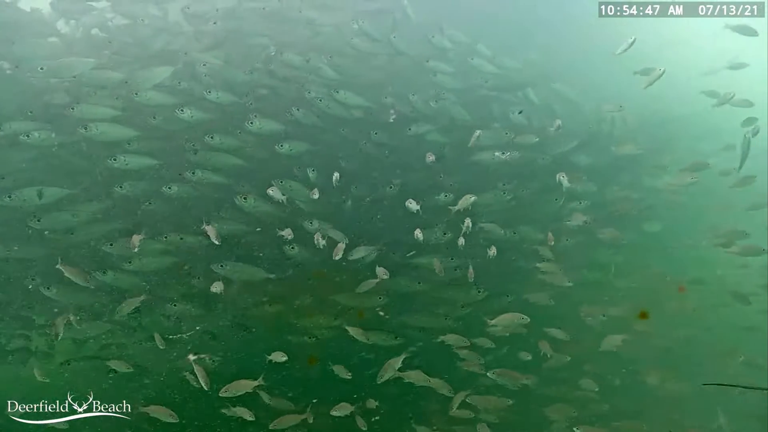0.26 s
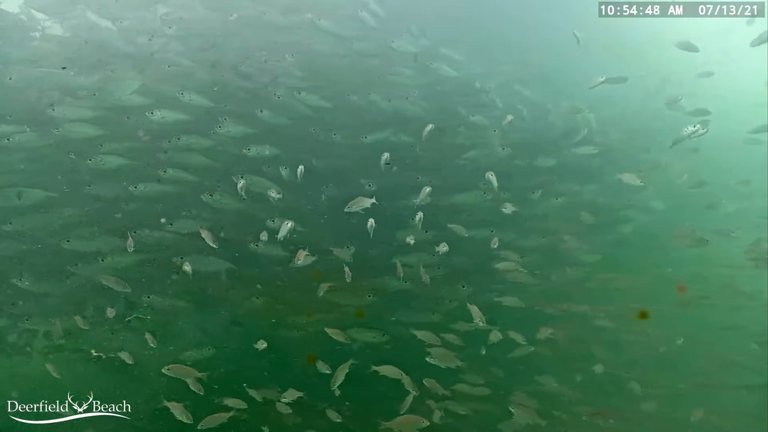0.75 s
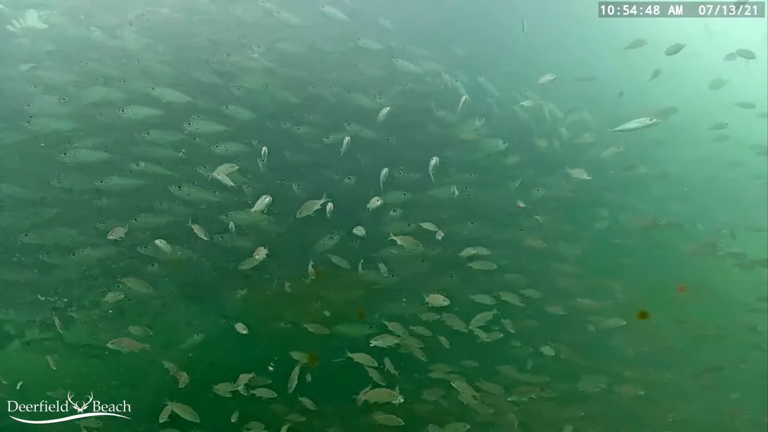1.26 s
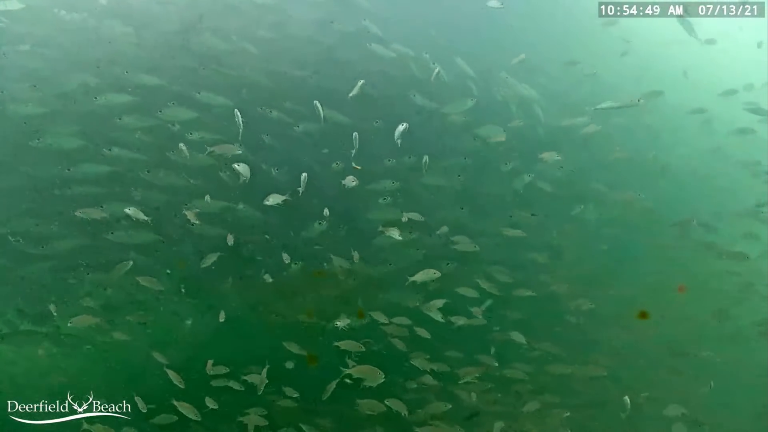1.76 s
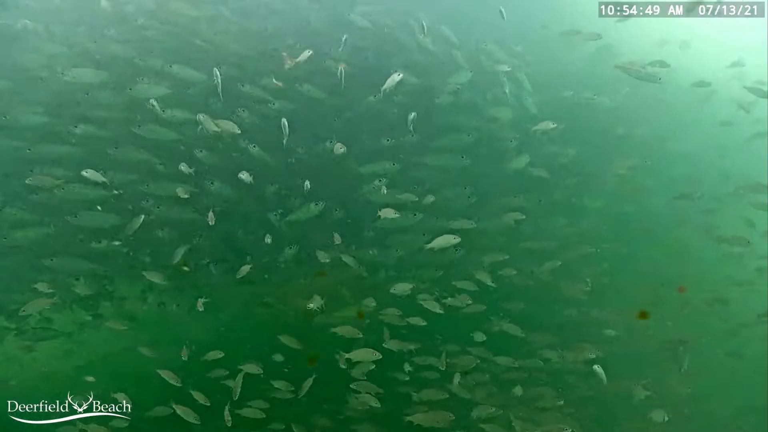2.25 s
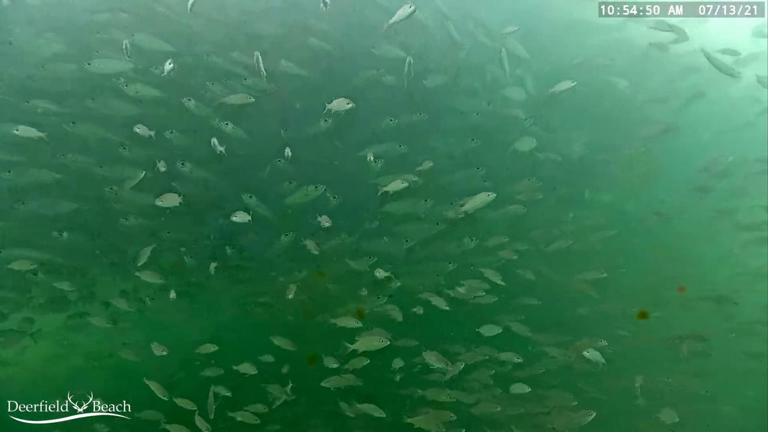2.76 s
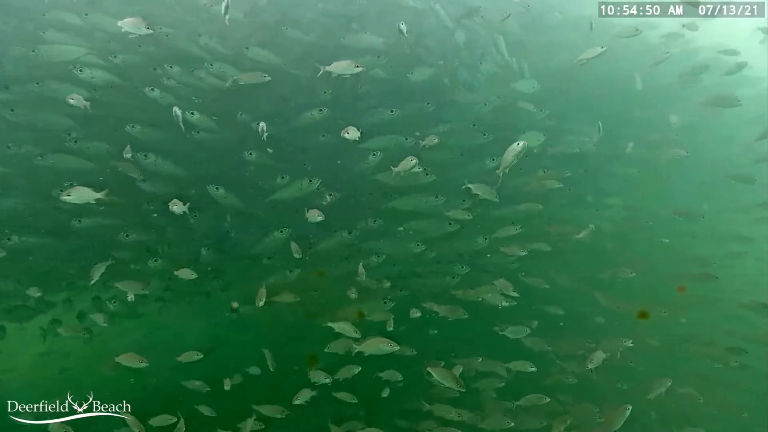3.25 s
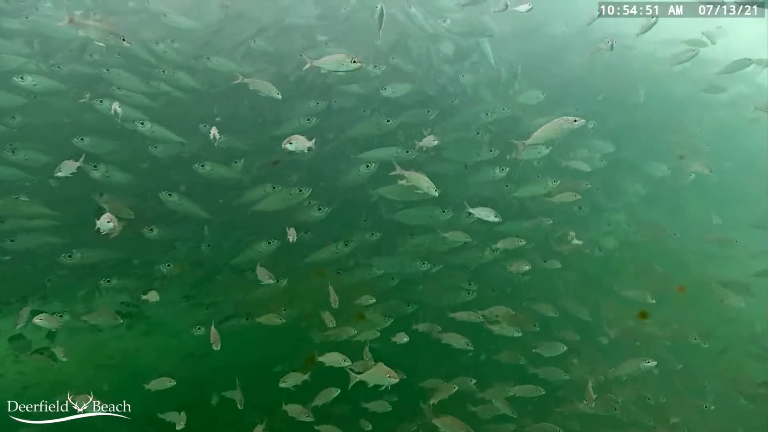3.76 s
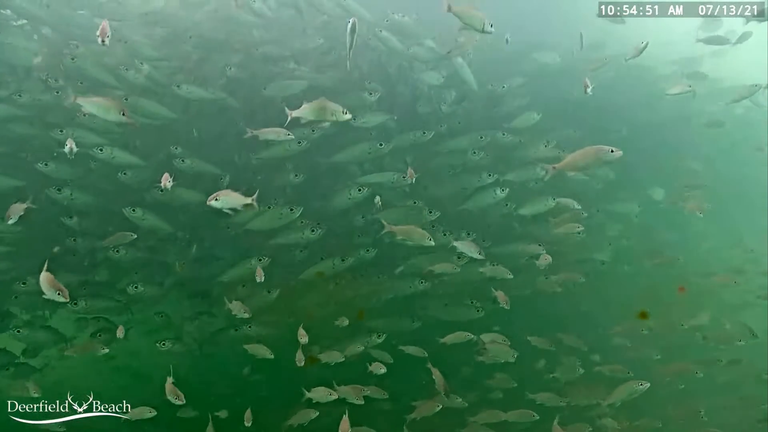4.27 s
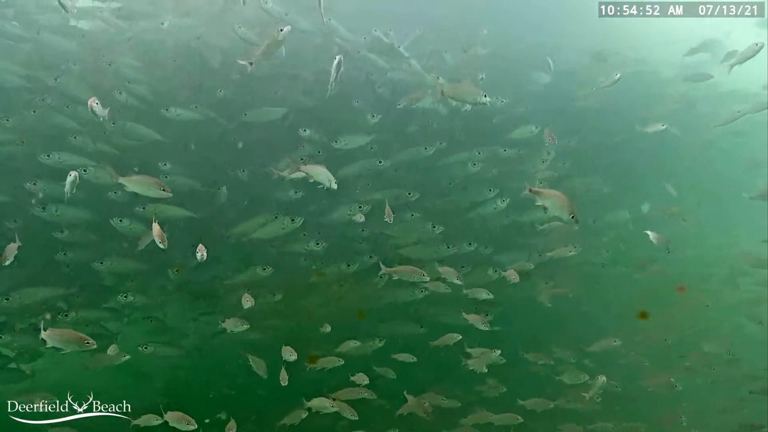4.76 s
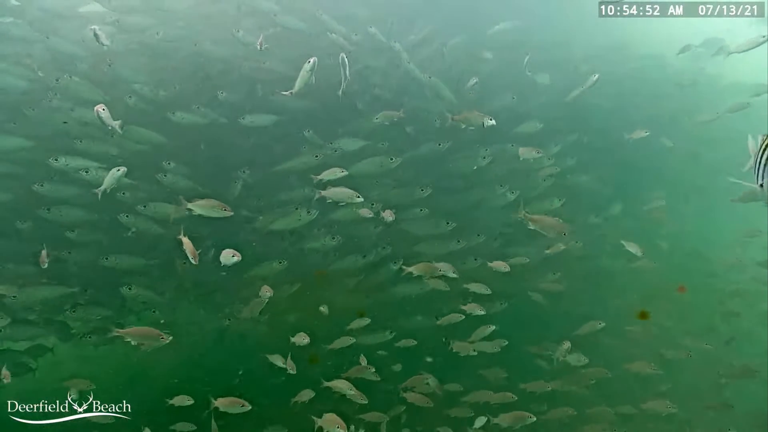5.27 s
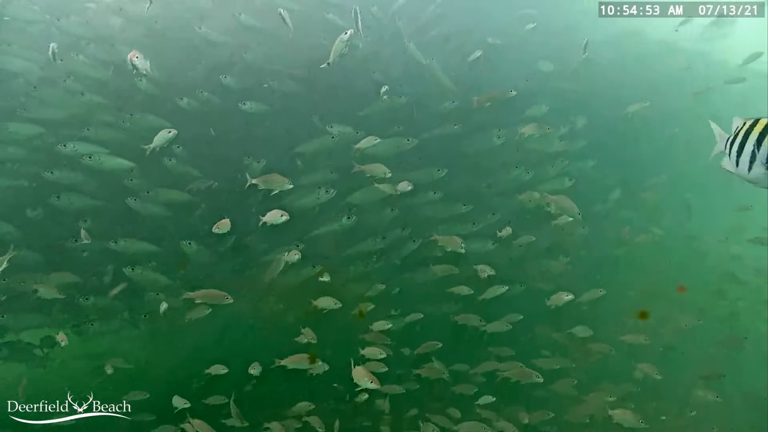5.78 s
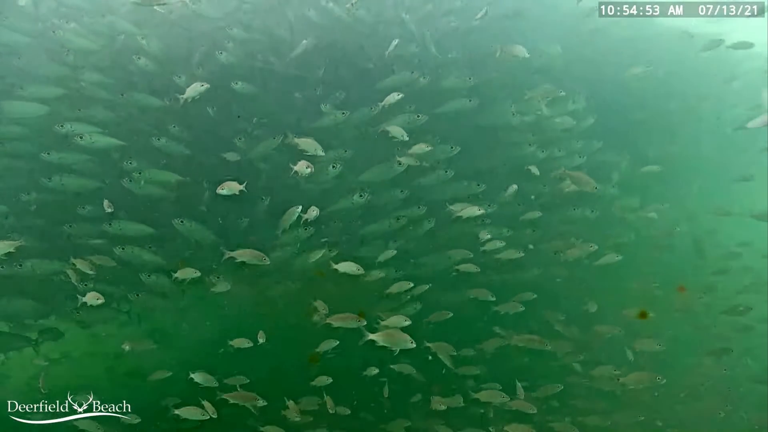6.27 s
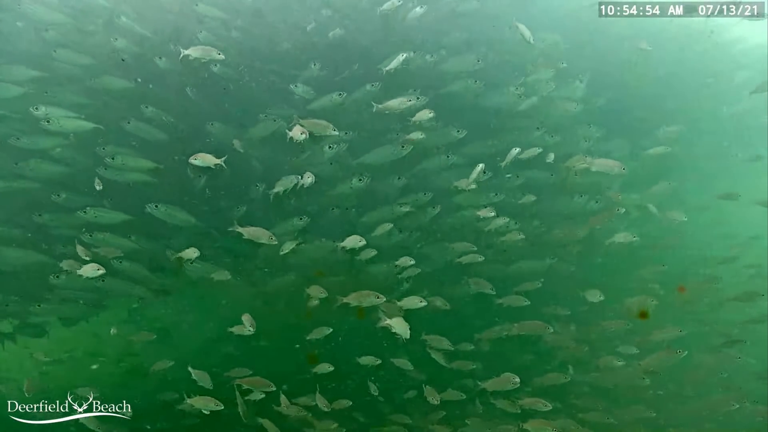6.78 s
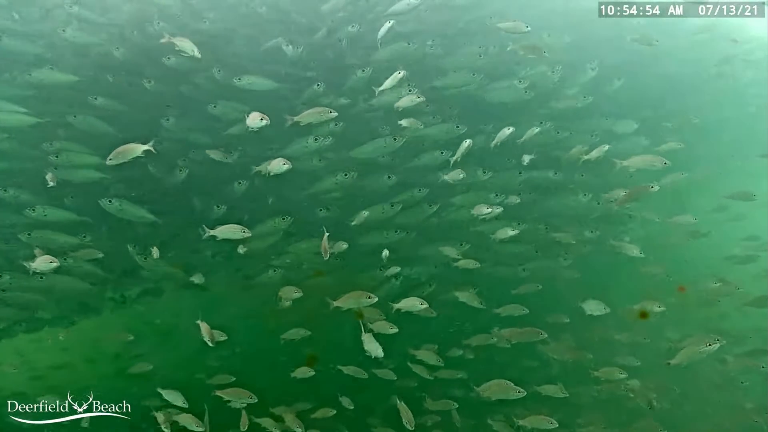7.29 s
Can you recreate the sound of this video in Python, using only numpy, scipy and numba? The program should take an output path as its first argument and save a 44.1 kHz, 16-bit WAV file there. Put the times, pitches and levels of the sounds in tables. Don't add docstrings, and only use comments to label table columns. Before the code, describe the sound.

A small quiet room with short reverberation, microphone close over a hard wooden tabletop, faint low hum and soft hiss throughout. At about 0.4 s a fingernail flicks a large coin: a click and brief bright ring. At 0.9 s a knuckle thuds softly on the wood with tiny bounces; faint skin rustles follow until 1.8 s. After near silence, a light touch at 2.5 s, then a crisp, clattering coin tap at 2.6 s. At 3.45 s the coin lands with the loudest sharp knocks, ringing high and booming the table, with another hard knock at 3.6 s. It spins: fast gritty pulses with bright hiss until 4 s, then woody grinding and rattling, roughly twenty wobbles a second, slowing slightly. Harder knocks stand out near 4.4, 5.4 and 6.6 s. The wobbles grow slower, uneven and weaker, with faint finger rustles around 7 s, fading into small scrapes by 7.5 s.

```python
import sys
import numpy as np
from scipy import signal
from scipy.fft import rfft, irfft
from scipy.io import wavfile
from scipy.ndimage import uniform_filter1d
from numba import njit

SR = 44100
rng = np.random.default_rng(int(sys.argv[2]) if len(sys.argv) > 2 else 0)


def waveform_to_disk(signal):
    frames = np.transpose(np.atleast_2d(signal))
    scaled = np.clip(frames, -1, 1) * 32767
    samples = np.round(scaled).astype(np.int16)
    wavfile.write(sys.argv[1], SR, samples)


def attenuation_scalar(level_db):
    decades = np.asarray(level_db, float) / 20
    return 10 ** decades


N = 332073
TIME = np.arange(N) / SR
STEP = 40
EDGES_HZ = 40 * 2 ** np.arange(0, 9, .5)
SPIN_START_S = 3.546


def rms_one(x):
    return x / np.sqrt(np.mean(x ** 2) + 1e-30)


def at_hz(points, hz):
    points_hz, values = np.transpose(points)
    return np.interp(np.log(hz), np.log(points_hz), values)


def at_time(points, s):
    return np.interp(s, *np.transpose(points))


def band(x, low_hz, high_hz, order=2):
    edges = [low_hz, min(high_hz, .45 * SR)]
    return signal.sosfilt(signal.butter(order, edges, "band", fs=SR, output="sos"), x)


def resonance(x, hz, width_hz):
    r = np.exp(-np.pi * width_hz / SR)
    poles = [1, -2 * r * np.cos(2 * np.pi * hz / SR), r * r]
    return signal.lfilter(np.array([1, 0, -1]) * (1 - r * r) / 2, poles, x)


@njit
def moving_resonance(x, gains, angles, r, step, first):
    out, y1, y2 = np.zeros(len(x)), 0., 0.
    for k in range(first, len(x) // step + 1):
        a, g = 2 * r * np.cos(angles[k]), (1 - r * r) / 2 * gains[k]
        for i in range(k * step, min(k * step + step, len(x))):
            y1, y2 = g * (x[i] - x[i - 2]) + a * y1 - r * r * y2, y1
            out[i] = y1
    return out


def ring(clicks, hz, t60):
    r, w = attenuation_scalar(-60 / (t60 * SR)), 2 * np.pi * hz / SR
    return signal.lfilter([0, np.sin(w)], [1, -2 * r * np.cos(w), r * r], clicks + 1e-18)


def convolve(x, response):
    return signal.fftconvolve(x, response)[:N]


def slow(rate):
    r = np.exp(-2 * np.pi * rate * STEP / SR)
    white = rng.standard_normal(N // STEP + 2002)
    return rms_one(signal.lfilter([1], [1, -2 * r, r * r], white)[2000:])


def drift(rate):
    steps = slow(rate)
    return np.interp(np.arange(N) / STEP, np.arange(len(steps)), steps)


def around(s):
    return slice(max(int((s - .2) * SR), 0), int((s + .3) * SR))


def add(out, s, rise, fall, gains):
    near = around(s)
    t = TIME[near] - s
    shape = np.exp(np.where(t < 0, -(t / max(rise, 2e-4)) ** 2, -t / max(fall, 5e-4)))
    out[:, near] += np.reshape(gains, (-1, 1)) * shape


def wood_response(spectrum, splits_hz):
    hz = np.maximum(np.fft.rfftfreq(8192, 1 / SR), 10)
    parts = []
    for low, high in zip(splits_hz, splits_hz[1:]):
        skirts = np.sqrt((1 + (low / hz) ** 14) * (1 + (hz / high) ** 14))
        size = attenuation_scalar(at_hz(spectrum, hz)) / skirts
        folded = irfft(np.log(size + 1e-7 * size.max()))
        folded[1:4096] *= 2
        folded[4097:] = 0
        parts.append(irfft(np.exp(rfft(folded))))
    return [p / np.sqrt(np.sum(p ** 2)) for p in parts]


def on_wood(force, spectrum, modes, splits_hz, wander_db, bend, glancing_db=0):
    parts = wood_response(spectrum, splits_hz)
    broad = sum(convolve(f, part) for f, part in zip(force, parts)) + 1e-18
    step_s = np.arange(N // STEP + 2) * STEP / SR
    late_db = glancing_db * (step_s > 4.2)
    first = int(2.6 * SR / STEP)
    out = broad.copy()
    for (hz, width_hz, db), bent in zip(modes, np.broadcast_to(bend, len(modes))):
        gains = attenuation_scalar(db + late_db + wander_db * np.tanh(slow(rate=20)))
        angles = 2 * np.pi * hz / SR * (1 + bent * slow(rate=8.3))
        out += moving_resonance(broad, gains, angles, np.exp(-np.pi * width_hz / SR), STEP, first)
    return out


def rustles(rows, swelling):
    white, out = rng.standard_normal(N), np.zeros(N)
    for s, db, hz, octaves, length in rows:
        force = np.zeros((1, N))
        add(force, s, length if swelling else .001, length, attenuation_scalar(db))
        near = around(s)
        half = 2 ** (octaves / 2)
        out[near] += force[0, near] * rms_one(band(white[near], hz / half, hz * half, order=3))
    return out


# [f/Hz, level/dB per Hz]
FLOOR = [(15, -66), (25, -36), (47, -13.5), (137, -9), (195, -6.5), (223, -12), (256, -10), (384, -14.5),
         (416, -16), (463, -16.5), (714, -21.5), (1940, -24), (2160, -22), (2610, -27.5), (16000, -52)]
# [t/s, level/dB]
FLOOR_LEVEL = [(0, -73), (.35, -74.5), (0.6, -65), (.92, -70.5), (1.21, -66.5), (1.8, -69), (2.12, -75),
               (2.55, -72.5), (2.85, -65.5), (3.3, -76), (3.44, -72.5), (3.63, -65), (6.0, -66.5),
               (7.1, -65.5), (7.53, -67.5)]
# [f/Hz, width/Hz, level/dB rms]
HUM = [
    (171, 16, -73),
    (468, 32, -75),
    (1057, 210, -83.5),
    (2135, 22, -79),
]


def floor():
    level_db = at_time(FLOOR_LEVEL, TIME)
    white, (rumble, rustle) = rng.standard_normal((3, N)), np.zeros((2, N))
    for k, (a, b) in enumerate(zip(EDGES_HZ, EDGES_HZ[1:])):
        part = rustle if a > 1200 else rumble
        part += attenuation_scalar(at_hz(FLOOR, np.sqrt(a * b))) * band(white[k % 2], a, b)
    out = attenuation_scalar(level_db + 6.5) * rms_one(rumble) + attenuation_scalar(level_db - 6.5) * rms_one(rustle)
    for (hz, w, db), follows in zip(HUM, [0, 0, 0, 0.4]):
        line = rms_one(resonance(resonance(white[2], hz, w), hz, w))
        out += attenuation_scalar(db + follows * (level_db + 66.5)) * line
    return out


# [f/Hz, t60/s]
ROOM_T60 = [(150, 0.2), (530, 0.25), (1400, 0.25), (3000, 0.24), (4600, 0.26), (6500, .28), (9700, 0.065),
            (16000, 0.048)]


def room(x):
    t = np.arange(SR // 2) / SR
    white = rng.standard_normal((2, len(t)))
    tail = np.zeros(len(t))
    for k, (a, b) in enumerate(zip(EDGES_HZ, EDGES_HZ[1:])):
        tail += band(white[k % 2], a, b) * attenuation_scalar(-60 * t / at_hz(ROOM_T60, np.sqrt(a * b)))
    power = np.abs(rfft(tail)) ** 2 + 1e-12
    evened = np.sqrt(uniform_filter1d(power, size=300) / uniform_filter1d(power, size=40))
    tail = irfft(rfft(tail) * evened, len(t))
    tail *= np.clip((t - .003) / .004, 0, 1)
    tail *= np.clip((.4 - t) / .1, 0, 1)
    return convolve(x, tail / np.sqrt(np.sum(tail ** 2)))


# [t/s, level/dB, centre f/Hz, width/octaves, half length/s]
BRUSHES = [(.84, -75, 5000, 1, 0.027), (1.02, -82, 5000, 1.8, 0.055), (1.17, -68.5, 9000, 1.2, .02),
           (1.25, -72.5, 3900, 1.4, 0.13), (1.352, -79, 13000, .35, .012), (1.45, -88, 4500, 1.7, .1),
           (1.548, -67, 12000, .9, .01), (1.7, -81.5, 4970, 1.3, 0.16), (1.74, -75, 7600, .12, 0.014),
           (1.84, -87, 7600, .12, 0.018), (6.912, -68, 11800, 0.37, 0.017),
           (6.915, -62.5, 7850, 0.37, 0.02), (7.32, -75, 8600, 0.36, .03)]


def brushes():
    return rustles(BRUSHES, swelling=True)


# [t/s, level/dB, centre f/Hz, width/octaves, length/s]
TOUCHES = [(.706, -73, 5600, .4, .003), (.8895, -47, 3000, 1.3, .002), (.891, -56, 7900, 1.5, .002),
           (.9, -65, 7800, .6, .003), (.909, -69, 7500, .2, .003), (.9245, -63, 3700, .5, .007),
           (.926, -58, 8800, .35, .004), (.927, -63, 13000, .26, .006), (.931, -62, 5700, .17, .006),
           (1.117, -75, 11000, .6, .002), (1.155, -69, 11000, .9, .005), (1.165, -77, 5850, .15, .012),
           (1.506, -66, 7600, .15, .011), (1.507, -66, 11500, 1, .003), (1.509, -71, 4450, .1, .003),
           (1.652, -73, 7500, .1, .005), (1.689, -58, 14500, .33, .011), (2.497, -58, 1500, .25, .004),
           (2.498, -61, 3200, .3, .002), (2.4985, -64, 4600, .25, .002), (2.499, -78, 9600, .1, .002),
           (2.539, -73, 7200, .4, .002), (3.391, -52, 2080, .52, .006), (3.392, -70, 3700, .15, .004),
           (5.106, -66, 11000, .8, .001), (6.977, -61, 13500, .3, .004), (6.978, -59, 7000, .8, .004),
           (7.343, -67, 4000, .3, .005), (7.417, -61, 6500, .5, .005), (7.429, -61, 7500, .9, .004),
           (7.489, -68, 6500, .6, .008)]


def touches():
    return rustles(TOUCHES, swelling=False)


# [f/Hz, level/dB per Hz]
FLICK = [(180, -54), (300, -42), (650, -19.5), (870, -27), (1320, -12.5), (1900, -11.5), (3190, -19),
         (4300, -21), (5900, -29), (7440, -17), (16000, -32)]


def flick():
    s, force = .3665, np.zeros((1, N))
    add(force, s, .0025, .0015, attenuation_scalar(-28.5))
    add(force, s + 0.011, .004, .008, attenuation_scalar(-56.5))
    scratch = force[0] * rng.standard_normal(N)
    scratch[int(s * SR)] += attenuation_scalar(-8.5)
    return convolve(scratch, wood_response(FLICK, [100, 18000])[0])


# [t/s, peak level/dB]
THUD = [
    (0.888, -29),
    (0.897, -50),
    (0.912, -66),
    (0.929, -67),
]
# [f/Hz, level/dB, t60/s]
THUD_MODES = [(246, -42, 0.074), (505, -12.5, 0.084), (777, 0.5, 0.02), (1160, 7.5, 0.0075),
              (1500, 6, 0.0013), (3650, -31, 0.011), (7600, -6, 0.012)]


def thud():
    s, db = np.transpose(THUD)
    clicks = np.zeros(N)
    clicks[(s * SR).astype(int) + 90] = -attenuation_scalar(db + 4)
    push = band(clicks, 204, 2500)
    return 10 * push + sum(attenuation_scalar(level) * ring(push, hz, t60) for hz, level, t60 in THUD_MODES)


# [f/Hz, level/dB, t60/s]
BOOM = [(162, -53, .09), (230, -43, .06), (295, -30, 0.08), (486, -29, 0.12)]
# [t/s, level/dB]
LANDINGS = [
    (3.457, 4.5),
    (3.479, 2),
    (3.547, -2),
    (3.596, -1.5),
    (3.648, -6.5),
    (3.705, -12.5),
    (3.759, -11.5),
]


def boom():
    clicks = np.zeros(N)
    for s, db in LANDINGS:
        clicks[int(s * SR)] = attenuation_scalar(db)
    return band(sum(attenuation_scalar(db) * ring(clicks, hz, t60) for hz, db, t60 in BOOM), 100, 900)


# [f/Hz, level/dB, t60/s]
COIN = [
    [(4387, 0, 1.6), (4440, -2, 1.5), (4470, -2, 1.5)],
    [(7599, 0, .6), (7625, -7, .5), (7560, -8, .4), (7660, -12, .4)],
    [(10116, -3, .6), (10158, -3, .6), (10205, 0, .55), (10260, -5, .5)],
]
# [t/s, low, middle and high group level/dB, time until damped/s]
STRIKES = [
    (0.366, -55, -41.5, -47.5, 0.26),
    (3.437, -102, -63, -69, 0.022),
    (3.454, -41, -58, -47, 0.2),
    (3.592, -42.5, -48, -45, 0.18),
    (4.393, -78.5, -57, -64, 0.073),
    (5.426, -67, -47, -64.5, 0.13),
]
DAMPED_T60_S = [.4, .14, .06]


def coin():
    out = np.zeros(N)
    flutter = attenuation_scalar([3.2 * drift(35) for group in COIN])
    for s, *group_db, length in STRIKES:
        start = int(s * SR)
        t = TIME[:min(SR, N - start)]
        span = slice(start, start + len(t))
        touched = np.maximum(t - length, 0)
        for modes, level_db, turn, damped in zip(COIN, group_db, flutter, DAMPED_T60_S):
            held = (1 - np.exp(-t / 0.0023)) * attenuation_scalar(-60 * touched / damped)
            tone = sum(attenuation_scalar(db - 60 * t / t60) * np.sin(2 * np.pi * hz * t) for hz, db, t60 in modes)
            out[span] += attenuation_scalar(level_db) * held * tone * turn[span]
    return out


# [t/s, peak level/dB, low, high and top share/dB]
KNOCKS = [(2.6169, -10.5, -4.5, -6, -22.5), (2.6185, -13.5, -3, -3, -14), (2.623, -20, -6.5, -8.5, -10),
          (2.63, -29, -6.5, -7, -14.5), (2.64, -29, -11, -5.5, -12.5), (2.647, -28, -7.5, -3.5, -6.5),
          (2.663, -24.5, -8, -7, -21.5), (3.456, -4.5, -6, -6.5, -27), (3.458, -4, -8, -6, -27),
          (3.4745, -6.5, -4, 0, -20), (3.4769, -6.5, -8, -7.5, -24), (3.4813, -8.5, -9.5, -15, -14.5),
          (3.503, -21.5, -1.5, -6.5, -22.5), (3.539, -18.5, -3.5, -6, -16.5), (3.5436, -18.5, -6, 0, -13),
          (3.548, -16, -3, -0.5, -17.5), (3.563, -24.5, -2.5, -4.5, -18), (3.5948, -9.5, -7.5, 2.5, -4),
          (3.5966, -11.5, -8, 1.5, -6.5), (3.608, -16.5, -8, -0.5, -16), (3.646, -18, 0, 3.5, -12),
          (3.9088, -20, -12, -5.5, -20.5), (4.395, -12.5, -5.5, -12, -23), (4.408, -11.5, -12, -16, -21),
          (4.4455, -13, -20, -11, -21), (5.4311, -15.5, -12, -3, -18), (5.4342, -13, -9, -13.5, -13),
          (6.6345, -16, -14, -10, -23), (6.979, -25, -9.5, -16, -20.5), (7.494, -46.5, 1.5, -18, -30)]
# [f/Hz, level/dB per Hz]
KNOCK_BROAD = [(24, -61), (40, -41.5), (467, -14.5), (1240, -5.5), (1340, -3), (1480, -8.5), (2260, 0),
               (3380, -5.5), (3830, -1), (4240, -6.5), (4570, -9), (13400, -46), (16000, -67)]
# [f/Hz, width/Hz, level over the broad answer/dB]
TAP_WOOD = [(1330, 50, 7), (1595, 47, 6), (1755, 30, 10), (1880, 20, 12), (2200, 30, 7), (2476, 24, 7.3),
            (2530, 24, 8), (2680, 21.1, 12), (3070, 28, 9), (3208, 24, 8), (3900, 40, 8.3), (4500, 24, 15),
            (5200, 40, 7), (5870, 33, 10), (6740, 47, 8.23), (7420, 26, 13), (8240, 30, 13), (9150, 36, 13)]
# [f/Hz, width/Hz, level over the broad answer/dB]
KNOCK_WOOD = [(690, 43, 2), (950, 40, 2), (1366, 45, 5), (1776, 11, 6), (2024, 16, 9.5), (2312, 20, 8),
              (2400, 27, 2.5), (2685, 25, 4), (2960, 13, 4), (3080, 16, 6), (3750, 30, 4), (3920, 45, 4),
              (4413, 14, 4.5), (4610, 14, 11), (5400, 60, 9), (5880, 42, -1), (6720, 60, 6), (7570, 40, 11),
              (7770, 31, 10.5), (8600, 95, 15.5)]


def knocks(from_s, to_s, modes):
    force, clicks = np.zeros((2, 4, N))
    for s, db, low_db, high_db, top_db in KNOCKS:
        if from_s < s < to_s:
            gains = attenuation_scalar([db + low_db, db, db + high_db, db + top_db])
            add(force, s, .0003, .0022, gains)
            clicks[:, int(s * SR)] = gains
    force = 0.84 * force * rng.standard_normal(N) - 1.5 * clicks
    return 0.51 * on_wood(force, KNOCK_BROAD, modes, [150, 1400, 3450, 7000, 18000],
                          wander_db=2.5, bend=.006, glancing_db=-7)


# [t/s, level/dB]
SKID = [(3.45, -102), (3.47, -64), (3.59, -62), (3.632, -55.5), (3.838, -72.5), (3.99, -75), (4.003, -99)]


def skid():
    flare = np.ones((1, N))
    for moment in np.linspace(*RUNS[1]):
        add(flare, moment, 0.0076, 0.0076, attenuation_scalar(0.5))
    grit = rng.standard_normal(N) * attenuation_scalar(2.5 * rng.standard_normal(N // 20 + 1).repeat(20)[:N])
    hiss = rms_one(band(grit, 7000, 16500) + 0.3 * band(grit, 12500, 16500))
    s, level_db = np.transpose(SKID)
    return flare[0] * attenuation_scalar(np.interp(TIME, s, level_db, -150, -150)) * hiss


# [t/s, level/dB]
GIVE = [(3.5, 12.5), (3.7, 4), (3.9, 4), (4.1, 4.5), (4.3, 3.5), (4.55, 2.5), (4.8, 0), (5.0, 1),
        (5.2, -0.5), (5.45, 6.5), (5.7, -0.5), (5.9, -3), (6.15, 4), (6.4, 0), (6.6, 0), (6.85, 1.5),
        (7.1, -8.5), (7.5, -6.5)]


def shares(s, db, bright_db):
    over_db = db + 28
    low_db = -1 - 0.58 * over_db + 0.16 * bright_db + at_time(GIVE, s)
    shine_db = 18.5 * np.exp((SPIN_START_S - s) / 0.27)
    high_db = -21 + 0.51 * over_db + bright_db + shine_db
    return attenuation_scalar([db + low_db, db, db + min(high_db, 6)])


# [first t/s, last t/s, wobbles]
RUNS = [
    (3.546, 3.648, 3),
    (3.705, 4.021, 7),
    (4.125, 4.567, 9),
    (4.77, 4.945, 4),
    (5.0, 5.43, 8),
    (5.485, 5.672, 4),
    (5.77, 6.033, 5),
    (6.1, 6.426, 6),
    (6.495, 6.765, 5),
    (6.842, 7.335, 8),
]
# [t/s, level/dB]
PRESSURE = [(3.546, -17.5), (3.65, -17), (3.83, -24), (4.02, -31), (4.125, -47.5), (4.24, -20.5),
            (4.41, -22.5), (4.57, -41.5), (4.8, -24), (5.18, -43.5), (5.37, -23.5), (5.77, -66.5),
            (5.9, -37.5), (6.36, -46.5), (6.6, -19.5), (6.84, -46.5), (7.13, -28.5), (7.33, -57.5)]
# [t/s, level/dB, brightness/dB, rise/s]
CATCHES = [(3.479, -12.5, -4.5, 0.002), (3.568, -31.5, -7.5, 0.0028), (6.576, -26, 3, 0.006),
           (6.505, -24, -5, 0.0064), (3.8, -22.5, 7, 0.0055), (3.968, -47, -6, 0.0077),
           (4.058, -32, 4.5, 0.011), (4.1714, -44, -7.5, 0.0034), (4.283, -23.5, 9, 0.0072),
           (4.6432, -27, -7.5, 0.0013), (4.757, -21, 5.5, 0.0008), (4.516, -24, 5, 0.005),
           (4.8934, -27, 15, 0.021), (4.947, -20, 8.5, 0.011), (5.0647, -17, -2.5, 0.012),
           (5.255, -29.5, 10.5, 0.012), (5.543, -27.5, -23, 0.0062), (5.4018, -29, 1, 0.0056),
           (5.6687, -25, -4, 0.0021), (5.8352, -26, -4, 0.0019), (5.9557, -28.5, 9.5, 0.0044),
           (7.134, -18.5, 0.5, 0.014), (6.1018, -25.5, 6.5, 0.019), (6.159, -35, 1, 0.0036),
           (6.224, -29, -2, 0.0084), (6.424, -26.5, 0, 0.009), (6.689, -21, 9.5, 0.003),
           (6.481, -27.5, 13, 0.0033), (6.654, -20.5, 8.5, 0.02), (6.7674, -22.5, 5, 0.0083),
           (6.9103, -22.5, -2.5, 0.0063), (6.983, -28.5, 2, 0.0066), (7.4244, -27.5, -1, 0.014),
           (7.493, -30.5, -6, 0.011)]
# [t/s, level/dB, low share/dB, brightness/dB]
BITES = [(3.53, -21, -1, 20), (3.644, -33, -20, 0), (3.716, -21, 3.5, 8), (3.759, -22.5, 1, 4),
         (3.852, -20, 4.5, 9.5), (3.958, -32.5, 5, 7), (3.9648, -23, -14, -5), (4.117, -41, -0.5, 7),
         (4.168, -28, -2, -3), (4.2293, -24, -12, 0), (4.333, -37, 0, -5), (4.352, -31.5, 3, -11),
         (4.564, -50, 0, -1), (4.773, -38, -5, 0), (4.817, -28, 2, 13), (4.881, -41.5, -17, -4),
         (4.9303, -30, -1, -6), (5.011, -24.5, 2.5, 4), (5.1156, -30, 0.5, 9), (5.176, -28, 5.5, 2),
         (5.236, -24.5, 2, -7), (5.2966, -24, 0, -3), (5.318, -31, 2.5, -3), (5.347, -32.5, 2, 0),
         (5.3712, -43.5, -4, 3), (5.557, -31, -13, 6), (5.6056, -33.5, -0.5, 4), (5.7684, -45, 5.5, 7),
         (5.890, -34.5, 8, -1), (5.949, -27, 4, 5), (5.976, -31.5, 1.5, 6), (6.038, -54, 5, 6),
         (6.0665, -47, -3, 5), (6.082, -32.5, 5, -2), (6.149, -33.5, -0.5, -1.5), (6.286, -38, 1, -2),
         (6.2975, -27.5, -2.5, -4), (6.348, -32.5, 6.5, 0), (6.491, -21, 4.5, 3), (6.562, -37.5, 10.5, -3),
         (6.62, -31, 0, -1), (6.784, -33, -7, 2), (6.8412, -49, 6.5, 3), (6.896, -30.5, -5, 0),
         (7.0483, -19, -8, -13), (7.116, -35, -4, -6), (7.148, -30, 5, -2.5), (7.188, -46, -2, 0),
         (7.2721, -42, -8, -0.5), (7.3301, -45, -6.5, 1.5)]
# [f/Hz, level/dB per Hz]
WOOD_BROAD = [(180, -56.5), (300, -26.5), (773, -15.5), (949, -7), (1430, -14.5), (1620, -2.5),
              (1810, -8.5), (2330, 3), (3400, -14), (6810, -32), (10800, -52.5), (13000, -60.5),
              (15500, -79.5)]
# [f/Hz, width/Hz, level over the broad answer/dB]
WOOD = [(715, 180, -10.5), (951.5, 49, 2), (1200, 40, -0.5), (1399, 26, 6), (1630, 91, -0.5), (1728, 64, 1),
        (1936, 33, 1), (1894, 180, -0.5), (2362, 78, -3.5), (2767, 86, 1.5), (3025, 41, 5), (3113, 29, 3.5),
        (3800, 170, 7.5), (4740, 100, 1), (5300, 94, -6), (6900, 55, -1.5), (7590, 330, 7),
        (7860, 220, 0.5)]
# [f/Hz, width/Hz, level over the broad answer/dB]
RIM = [(4450, 40, 5.5), (4616, 30, 8.5), (5290, 48, 5.5), (5744, 35, 11), (6660, 35, 10), (6970, 35, 11.5),
       (7600, 38, 13), (8200, 43, 15), (9200, 55, 14), (10020, 30, 5.5), (10800, 50, 10.5)]


def grinding():
    sizes = attenuation_scalar(2.6 * np.minimum(rng.exponential(1, N), 3.5)) * rng.choice([-1, 1], N)
    clicks = sizes * (rng.random(N) < 4000 / SR)
    grit = rms_one(clicks + 0.27 * rng.standard_normal(N))
    force = np.zeros((3, N))
    for s in np.concatenate([np.linspace(*run) for run in RUNS]):
        gains = shares(s, at_time(PRESSURE, s), 0)
        roll_db = -21.5 + 6 * np.exp((SPIN_START_S - s) / 0.42)
        add(force, s, 0.013, 0.013, attenuation_scalar(roll_db) * gains)
        add(force, s, 0.012, 0.015, gains)
    for s, db, bright_db, rise in CATCHES:
        add(force, s, rise, 0.0055, shares(s, db, bright_db))
    for s, db, low_db, bright_db in BITES:
        add(force, s, 0.0025, 0.0036, shares(s, db, bright_db) * attenuation_scalar([low_db, 0, 0]))
    modes = [(hz, max(width_hz, 45), db) for hz, width_hz, db in WOOD] + RIM
    bend = [.04] * len(WOOD) + [.004] * len(RIM)
    return 0.16 * on_wood(grit * force, WOOD_BROAD, modes, [250, 1400, 3350, 16000],
                          wander_db=9, bend=bend)


def scene():
    near = flick() + touches() + thud() + boom() + coin()
    near += knocks(0, 3, TAP_WOOD) + knocks(3, 8, KNOCK_WOOD) + grinding()
    return (floor() + brushes() + skid() + near + attenuation_scalar(-10) * room(near))[None]


def roll_off(x):
    return signal.sosfilt(signal.butter(12, 16190, fs=SR, output="sos"), x)


def record(dry):
    limited = np.clip(dry, -.86, .86)
    cut = signal.sosfilt(signal.cheby2(14, 66, 16450, fs=SR, output="sos"), limited)
    cut = signal.sosfilt(signal.butter(1, 25, "high", fs=SR, output="sos"), cut)
    return roll_off(cut)


dry = scene()
out = record(dry)
waveform_to_disk(out)
```